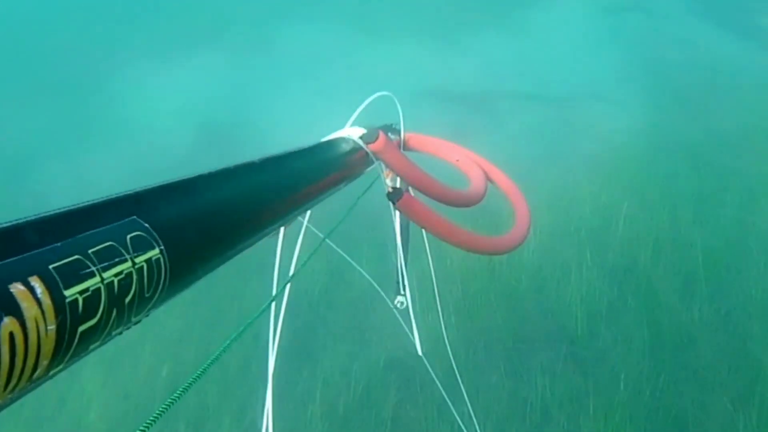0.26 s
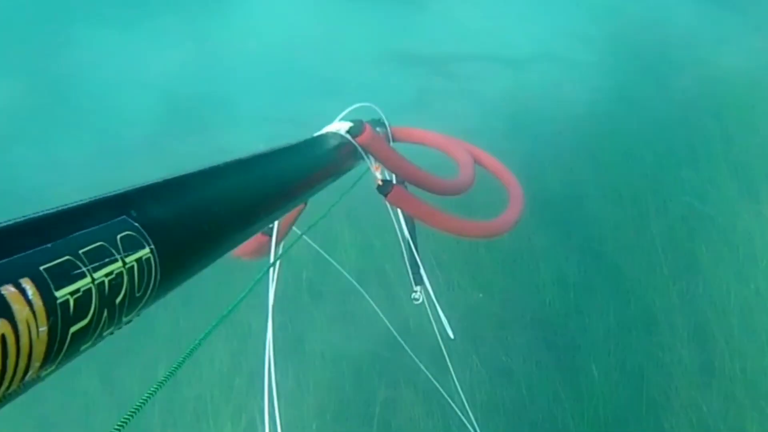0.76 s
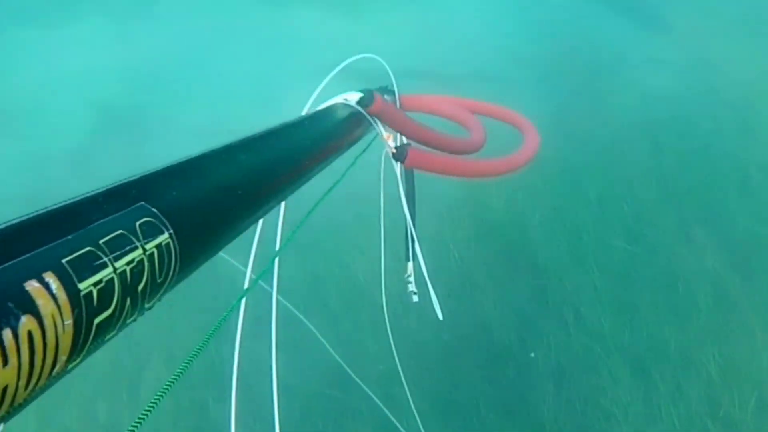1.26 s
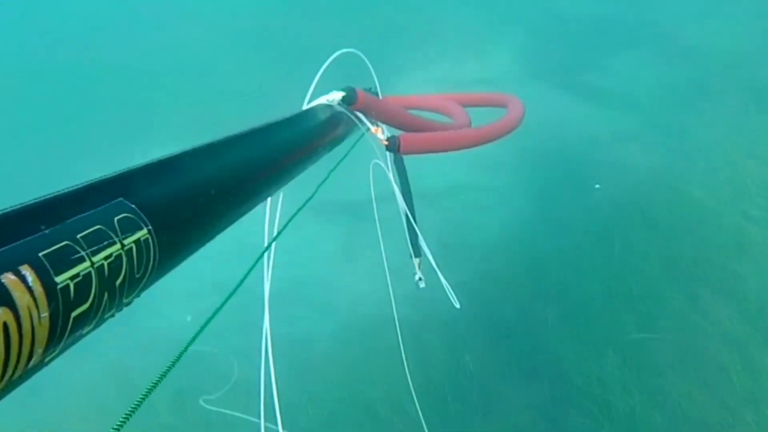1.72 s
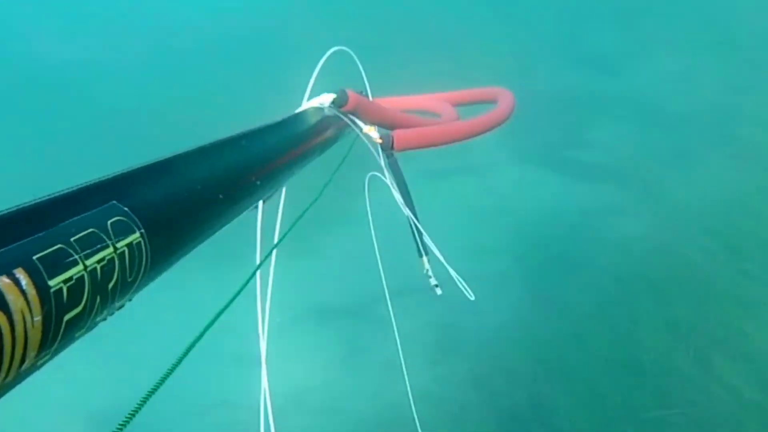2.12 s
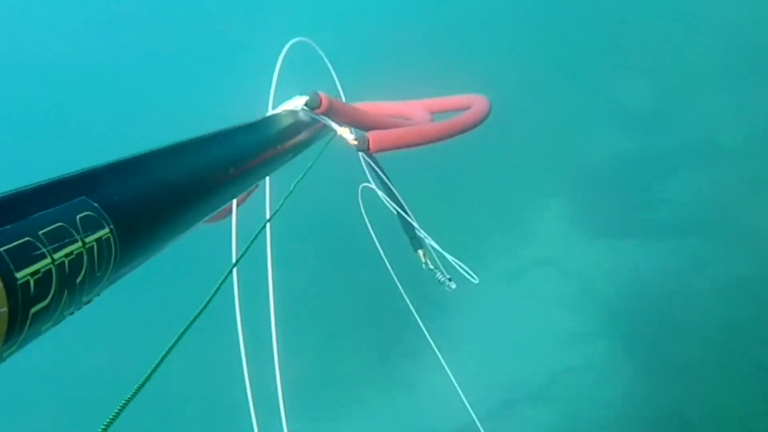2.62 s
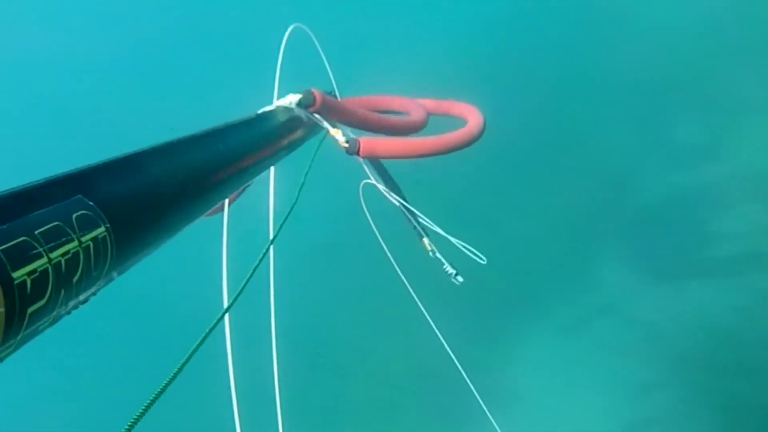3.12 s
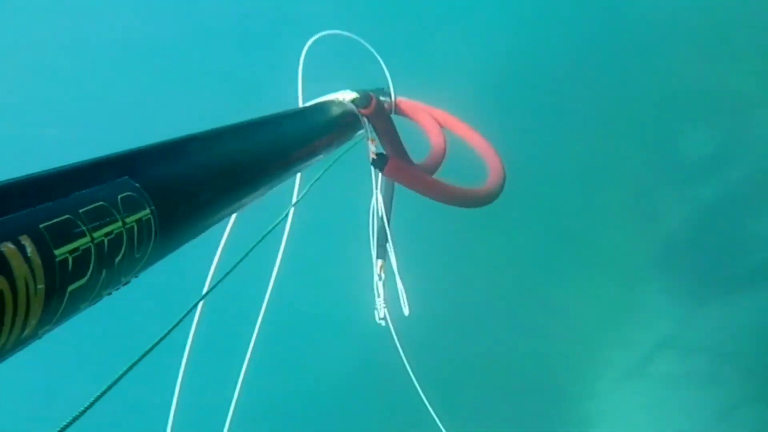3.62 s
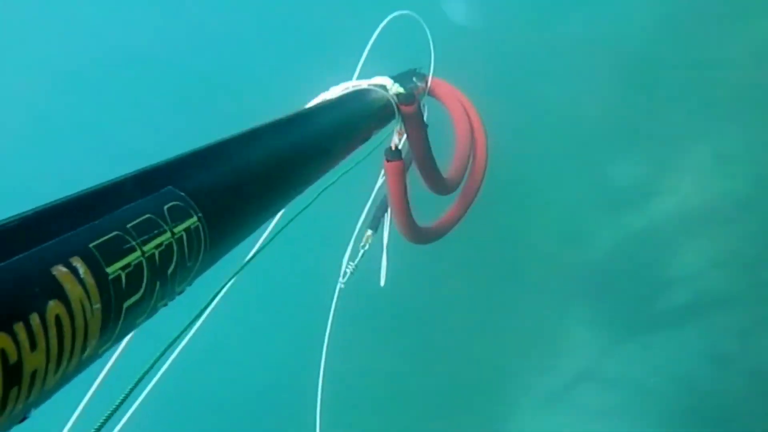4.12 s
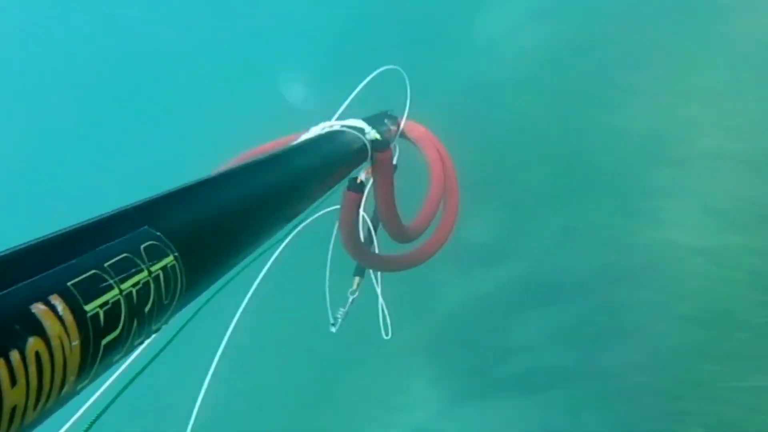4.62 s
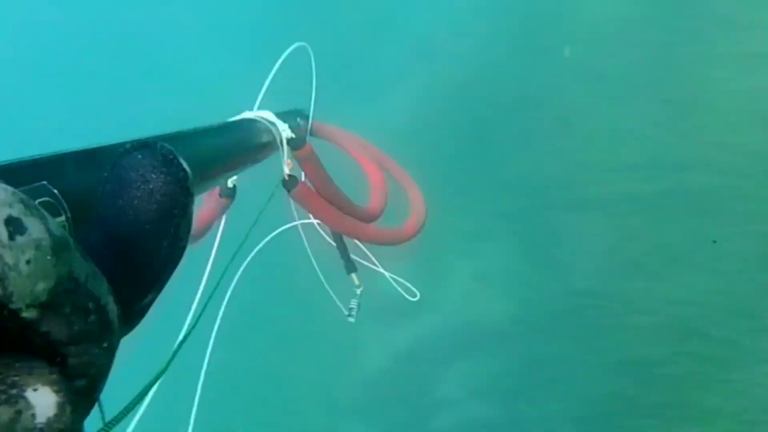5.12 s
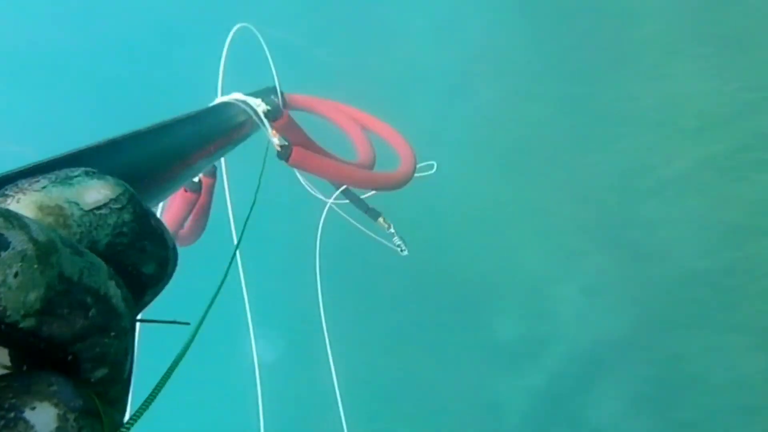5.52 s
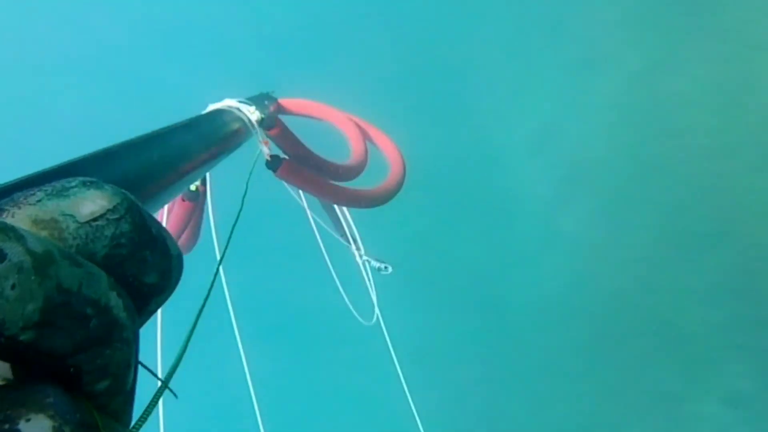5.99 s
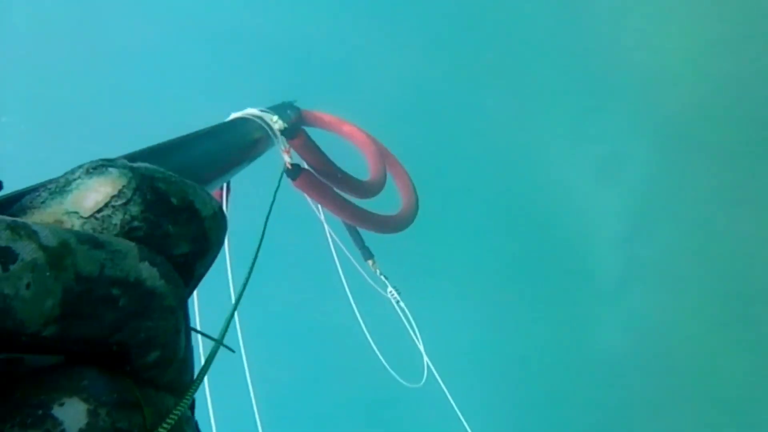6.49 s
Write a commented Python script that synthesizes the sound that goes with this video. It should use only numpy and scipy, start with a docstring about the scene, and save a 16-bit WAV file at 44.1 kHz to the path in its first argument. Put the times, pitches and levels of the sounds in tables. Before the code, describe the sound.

Close, muffled underwater sound in a sealed plastic housing. Soft gurgling flow and low pressure rumble lie over thin electronic hiss. Tiny bubble clusters tick and plop early on, with light taps on the case. Later knocks grow heavier, then a strong stroke brings distorted gushes, sudden dropouts, sharp gear clicks and ringing bubbles. Afterwards the rush eases to dull buffeting and repeated bumps and scrapes.

```python
"""Under water, inside a waterproof camera housing, while a diver swims with a speargun.
Water sways and rushes against the case: shaped noise, partly ringing the case's resonances.
Gear knocks and clicks on it as short noise bursts, and small bubbles ring as fading tones.
In the strongest strokes the pressure pins the microphone at its limit, chopping the rush into bursts.
Behind it all lie the hollow hum of the air in the case and the camera's hiss and whine."""
import sys
import numpy as np
from scipy import signal
from scipy.fft import rfft, irfft
from scipy.io import wavfile
from scipy.ndimage import uniform_filter1d

SR = 44100
rng = np.random.default_rng(int(sys.argv[2]) if len(sys.argv) > 2 else 0)


def to_wav(sig):
    """Store sig (one row per channel, or 1-D mono) as 16-bit WAV at the path in sys.argv[1].

    Samples outside -1..1 are clipped; the rate is SR.
    """
    pcm = np.clip(np.atleast_2d(sig), -1, 1) * 32767
    pcm = np.round(pcm).astype(np.int16)
    wavfile.write(sys.argv[1], SR, pcm.T)  # frames by channels


N = 297675
TIME = np.arange(N) / SR  # seconds

# relative noise spectra: (frequency [Hz], density [dB per Hz])
SWAY_COLOUR = [(4, -12), (9, 6), (17, -1), (30, -8), (42, -11.5), (60, -28.5), (110, -50), (250, -72)]
BUFFET_COLOUR = [(40, -19), (70, 6.5), (105, 3.5), (160, -14.5), (205, -11.5), (235, -6.5), (290, -12),
                 (370, -23.5), (700, -26.5), (1500, -63)]
GUSH_COLOUR = [(150, 12.5), (350, 10), (700, 9), (1000, 8.5), (1500, 4), (2400, -4), (3600, -13.5),
               (6000, -54.5)]
SPRAY_COLOUR = [(1500, -48.5), (3000, -3), (4200, -5.5), (5200, 0.5), (7000, -7.5), (10000, -9.5),
                (15000, -7), (16500, -11)]
HISS_COLOUR = [(300, 17.5), (2000, -11), (2500, -12), (3000, 4), (3600, -4), (4400, 0.5), (5200, -6),
               (6200, -2), (7400, -9), (11000, -9.5), (13000, 0.5), (14200, 5.5), (15200, 6.5),
               (16200, -30)]
# resonances of the case wall: (frequency [Hz], width [Hz], relative level [dB])
LOW_MODES = [(376, 720, -6.5), (585.2, 64.4, 16), (813.7, 44, 10.5), (925, 84, 2)]
HIGH_MODES = [(1052, 193, 6.5), (1296, 171, 7), (1553, 180, 6), (1780, 144, 2), (2260, 200, -7.5),
              (3300, 1800, -51)]
# resonances of the air inside the case: (frequency [Hz], basic width [Hz], relative level [dB])
AIR_MODES = [(229.7, 160, -1.5), (621, 30, 2.5), (810, 88, 1), (1037, 130, -14.5), (1154, 120, 0),
             (1240, 240, -13.5), (1625, 64, 4), (1767, 240, -1), (1910, 130, -3.5), (2103, 170, -5.5),
             (2866, 66, -12), (4290, 81, -16.5)]
# hum of that air: (time [s], level [dB])
HUM = [(0, -70), (0.28, -72), (0.5, -80), (1.5, -79.5), (2.1, -77), (2.7, -75), (6.75, -72.5)]
# strength of the current past the case, slacker between hard strokes: (time [s], level [dB])
CURRENT = [(0.0, -69.5), (0.43, -78.5), (0.9, -76), (1.11, -69), (1.31, -75.5), (1.96, -77.5), (2.4, -75),
           (2.9, -68.5), (3.12, -73), (3.3, -68), (3.5, -66.5), (3.8, -63.5), (3.96, -61.5), (4.4, -66.5),
           (5.33, -64.5), (5.6, -65), (5.96, -72), (6.2, -62), (6.3, -69.5), (6.43, -60.5), (6.75, -63)]
# low buffeting on the case, before its offset: (time [s], level [dB])
BUFFET = [(0.0, -76), (0.87, -72), (1.1, -54.5), (1.34, -70), (2.12, -75), (2.4, -71.5), (2.79, -70.5),
          (3.15, -73.5), (3.27, -60), (3.42, -67), (3.5, -61), (3.95, -57.5), (4.4, -49), (5.1, -60.5),
          (5.33, -50.5), (5.72, -53), (5.97, -61), (6.116, -59), (6.75, -50)]
# large eddies rolling over the case:
# (time [s], half length [s], change of pressure swing [dB], change of gurgle [dB])
EDDIES = [(0.063, 0.12, 3.5, -9), (1.202, 0.018, 13, -7), (2.4, 0.094, -5, 10.5), (3.281, 0.015, 8.5, 6.5),
          (3.776, 0.035, -5, 5.5), (3.653, 0.021, 7.5, 3.5), (4.288, 0.24, 11, -4.5),
          (5.048, 0.13, 10.5, -4), (5.437, 0.2, 6, -2.5), (5.829, 0.037, 7.5, -2), (6.553, 0.041, -11, -3)]
# bubble clouds drifting past: (time [s], half length [s], densest rate [ticks per s])
CLOUDS = [(0.64, 0.018, 350), (0.99, 0.08, 320), (1.68, 0.066, 170)]
# single bubbles, and a few fading tones that ring on just after the hardest knocks: # (time [s], starting pitch
# [Hz], relative level [dB])
BUBBLES = [(0.245, 6000, -61), (0.619, 2050, -62), (0.627, 1730, -57.5), (0.64, 2230, -62),
           (0.652, 2940, -60), (0.73, 2850, -65.5), (0.761, 2830, -67), (0.808, 4920, -64),
           (0.868, 2930, -60.5), (0.896, 2160, -53.5), (0.926, 6750, -66), (0.934, 1630, -65),
           (0.946, 1175, -59), (0.948, 2620, -56.5), (0.953, 4840, -63), (0.957, 1540, -53.5),
           (0.966, 1990, -54.5), (0.983, 1090, -57), (0.986, 1660, -56), (0.997, 5900, -61.5),
           (0.999, 3140, -66.5), (1.0, 1695, -57.5), (1.004, 807, -53), (1.034, 4840, -75),
           (1.091, 1770, -65), (1.117, 6000, -69), (1.179, 2310, -62.5), (1.202, 576, -52),
           (1.239, 4830, -70), (1.606, 1710, -65), (1.622, 6130, -67), (1.651, 8850, -64),
           (1.659, 3130, -70), (1.689, 940, -56), (1.688, 1735, -57.5), (1.693, 5160, -62.5),
           (1.714, 956, -49), (1.711, 1610, -65), (1.731, 2900, -65), (1.738, 855, -56), (1.74, 1590, -68),
           (1.766, 3000, -63.5), (1.767, 1500, -63), (1.787, 3200, -69), (1.789, 1510, -62.5),
           (2.268, 2040, -64.5), (3.092, 2560, -68), (3.327, 2710, -66.5), (3.364, 2850, -73),
           (3.371, 2230, -66), (3.653, 2900, -62.5), (3.974, 485, -36.5), (3.979, 810, -39),
           (4.002, 1450, -45), (4.139, 1260, -60), (4.236, 1266, -39.5), (4.306, 1670, -62),
           (4.543, 1413, -49), (4.982, 1670, -42), (5.037, 1070, -57.5), (5.27, 937, -36.5),
           (5.271, 1645, -44.5), (5.272, 3230, -50), (5.762, 808, -47.5)]
# gushes of water: (start [s], end [s], rush level [dB], spray level [dB])
GUSHES = [(0.622, 0.653, -80, -87), (0.931, 0.971, -61.5, -79), (0.988, 1.023, -65.5, -85),
          (3.973, 4.021, -47, -64), (4.04, 4.057, -45, -86), (4.095, 4.116, -68.5, -81),
          (4.14, 4.21, -58.5, -79), (4.231, 4.257, -44.5, -61), (4.424, 4.444, -50.5, -59),
          (4.457, 4.502, -53.5, -60.5), (4.524, 4.575, -52, -74.5), (4.84, 4.87, -57, -70.5),
          (4.883, 4.947, -56.5, -71.5), (4.94, 5.07, -49, -71), (5.081, 5.112, -52, -70)]
# knocks on the case, before the offsets of each part:
# (time [s], level [dB], brightness [dB], thud against the ring [dB], scuff length [s])
KNOCKS = [(0.656, -53.5, -14, -7, 0.034), (0.76, -55, -13, -15, 0.024), (1.071, -48.5, -12, 10.5, 0.013),
          (1.175, -44, -16.5, -16, 0.014), (1.196, -50.5, -10.5, -12, 0.013),
          (1.279, -58.5, -7, 0.5, 0.027), (1.297, -62.5, -16, 16, 0.048), (1.688, -55.5, -9, 3.5, 0.03),
          (1.713, -56.5, -16, 10.5, 0.037), (2.172, -67, 6, -12, 0.028), (2.432, -65, 8, -11, 0.056),
          (2.486, -53, -21, -29, 0.027), (2.862, -51.5, -25, 0, 0.083), (3.008, -45, -23, -7, 0.018),
          (3.229, -46, -35, -16, 0.036), (3.244, -43.5, -33, -26, 0.028), (3.326, -54, -22, -10, 0.022),
          (3.609, -42, -25, -27, 0.031), (3.766, -48, -6, -13, 0.076), (3.902, -48.5, -6.5, -3, 0.025),
          (3.974, -30.5, -6, -2.5, 0.017), (4.014, -32.5, -9, -3, 0.0099), (4.035, -25, -22, -19, 0.018),
          (4.185, -62, 5, 0, 0.018), (4.272, -39, -4, 10, 0.018), (4.327, -45.5, -7, 3.5, 0.0067),
          (4.237, -36, -5, 6, 0.024), (4.307, -53.5, 1.5, 20.5, 0.021), (4.567, -48, -5, -8, 0.012),
          (4.983, -26, -18, -2, 0.032), (5.01, -32, -3.5, -1, 0.037), (5.056, -37.5, -19, -11, 0.029),
          (5.303, -39.5, -7, -4.5, 0.02), (5.394, -38, -4, -2.5, 0.021), (5.494, -53.5, -1, 1, 0.019),
          (5.519, -41, -9, 3.5, 0.031), (5.571, -41, -9, -5.5, 0.09), (5.699, -39.5, -9, 0.5, 0.061),
          (5.719, -43.5, -15, -16, 0.034), (5.759, -37.5, -12, -2, 0.028), (5.798, -48, -11, 1, 0.02),
          (5.816, -45.5, -6.5, -18, 0.042), (5.876, -45.5, -6, -15, 0.024), (6.096, -41, -6, -7, 0.064),
          (6.171, -51, -15, -3.5, 0.028), (6.212, -48, -10, -15, 0.071), (6.33, -47, -10, -4, 0.067),
          (6.394, -55, -8, -19, 0.019), (6.445, -40.5, -11, -25, 0.053), (6.5, -36, -11, -15, 0.052),
          (6.519, -46, -8, -20, 0.048), (6.535, -50, -5.5, -10, 0.044), (6.577, -49.5, -9, -21, 0.013),
          (6.659, -46.5, -31, -18, 0.018), (6.675, -41, -8, -24, 0.024)]
# hard clicks of the gear, and at 5.2 s the snap as the microphone flips from one limit to the other: # (time
# [s], level [dB], length [s], pitch [Hz], treble [dB])
CLICKS = [(3.538, -52.5, 0.0053, 1130, -6), (3.542, -45, 0.0024, 3300, -11),
          (4.001, -49.5, 0.0016, 5570, 15), (4.237, -53, 0.0024, 1390, 1),
          (4.2662, -41, 0.00077, 2000, -11), (4.438, -48, 0.00027, 3020, 28),
          (4.552, -52, 0.00073, 2480, -3), (4.596, -32, 0.0024, 880, -18), (4.596, -34, 0.0018, 2650, -9),
          (4.622, -45, 0.004, 820, -16), (4.857, -50, 0.0057, 1580, -16), (4.962, -52, 0.003, 2850, 7),
          (5.017, -44.5, 0.00074, 1710, -20.5), (5.2, -39, 0.0015, 1600, -11),
          (5.247, -41.5, 0.0012, 4040, 25), (5.269, -39.5, 0.0014, 2450, -11),
          (5.272, -41.5, 0.0028, 1400, -13)]
PUSH, PULL = 1, -1
# surges that overload the microphone: (start [s], end [s], direction [PUSH or PULL], edge [s])
SURGES = [(4.023, 4.034, PULL, 0.002), (4.039, 4.043, PUSH, 0.0026), (4.047, 4.054, PULL, 0.004),
          (4.062, 4.096, PUSH, 0.0089), (4.108, 4.133, PUSH, 0.0045), (4.207, 4.23, PULL, 0.0037),
          (4.265, 4.274, PULL, 0.0022), (4.282, 4.294, PUSH, 0.0073), (4.332, 4.337, PULL, 0.0046),
          (4.352, 4.359, PUSH, 0.0039), (4.433, 4.45, PULL, 0.0032), (4.494, 4.524, PUSH, 0.0061),
          (4.556, 4.56, PUSH, 0.004), (4.581, 4.62, PUSH, 0.00095), (4.631, 4.835, PULL, 0.0084),
          (4.999, 5.004, PULL, 0.0051), (5.017, 5.023, PUSH, 0.0046), (5.05, 5.053, PULL, 0.0086),
          (5.065, 5.073, PUSH, 0.0047), (5.102, 5.198, PUSH, 0.0055), (5.202, 5.261, PULL, 0.0018)]

# layer level at the usual current [dB], and the dB it gains per dB of current
USUAL_CURRENT_DB = -68
SWAY_DB, SWAY_FOLLOWS = -38, 0.75
LOW_FLOW_DB, LOW_FLOW_FOLLOWS = -68.5, 1.21
HIGH_FLOW_DB, HIGH_FLOW_FOLLOWS = -75, 0.93
# how much of an eddy's dB change reaches the other layers
EDDY_BUFFET_SHARE, GURGLE_BUFFET_SHARE, GURGLE_HIGH_SHARE = 0.3, 0.29, 0.24
# time for a bubble up to 1 kHz to fade by 60 dB, and the power of pitch that shortens it above
BUBBLE_T60_S, BUBBLE_SHORTENS = 0.051, 0.75
STRAY_TICKS_PER_S = 2
MIC_LIMIT = 0.066  # sample value
# a pinned microphone holds its limit this long, then relaxes with this time constant
PIN_HOLD_S, PIN_RELAX_S = 0.052, 0.048
WHINE_HZ = 15000
TOP_HZ = 17000  # from here up, everything is at least 70 dB down


def from_db(db):
    """Turn decibels into a gain."""
    return 10 ** (np.asarray(db) / 20)


def rms_one(x):
    """Scale a sound to an average strength (rms) of 1."""
    return x / np.sqrt(np.mean(x ** 2) + 1e-20)


def in_time(rows):
    """Draw straight lines between timed rows: one curve per column."""
    s, *columns = np.transpose(rows)
    return [np.interp(TIME, s, c) for c in columns]


def swells(rows):
    """Add up bell-shaped swells."""
    return sum(height * np.exp(-((TIME - s) / half) ** 2) for s, half, height in rows)


def butter(x, hz, kind, order=2):
    """Filter a sound with a smooth Butterworth slope."""
    hz = np.clip(hz, 1, .45 * SR)
    return signal.sosfilt(signal.butter(order, hz, kind, fs=SR, output="sos"), x + 1e-18)


def noise(colour):
    """Make noise with the given spectrum and an rms of 1."""
    hz, db = np.transpose(colour)
    bins = np.maximum(np.arange(N // 2 + 1) * SR / N, 1)
    gain = from_db(np.interp(np.log(bins), np.log(hz), db, left=-120, right=-120))
    return rms_one(irfft(rfft(rng.standard_normal(N)) * gain, N))


def drift(rate):
    """Wander at random through this many new values per second, with an rms of 1."""
    knots = rng.standard_normal(4000)
    return rms_one(np.interp(TIME * rate, np.arange(len(knots)), knots))


def steady(x, seconds):
    """Even out the slow swells of a noise."""
    return x / np.sqrt(uniform_filter1d(x ** 2, max(int(seconds * SR), 2)) + 1e-9)


def resonate(x, modes):
    """Ring parallel resonances of alternating sign; narrow ones ring longer."""
    out = 0
    for k, (hz, width, db) in enumerate(modes):
        r = np.exp(-np.pi * width / SR)
        feedback = [1, -2 * r * np.cos(2 * np.pi * hz / SR), r * r]
        ring = signal.lfilter([1, 0, -1], feedback, x + 1e-18)
        out = out + (-1) ** k * from_db(db) * (1 - r * r) / 2 * ring
    return out


def chatter(envelope):
    """A short random burst with unit energy, its spectrum levelled before a final fade."""
    spectrum = rfft(rng.standard_normal(len(envelope)) * envelope)
    burst = irfft(spectrum / (np.abs(spectrum) + 1e-12), len(envelope)) * np.sqrt(envelope)
    return burst / np.sqrt(np.sum(burst ** 2))


def add(out, s, sound):
    """Mix a sound in at time s."""
    at = int(s * SR)
    out[at:at + len(sound)] += sound[:N - at]


def electronics(hiss_db=-82.5, whine_db=-94):
    """The camera's own hiss is shaped noise; its thin whine is a steady sine."""
    whine = np.sqrt(2) * np.sin(2 * np.pi * WHINE_HZ * TIME)
    return from_db(hiss_db) * noise(HISS_COLOUR) + from_db(whine_db) * whine


def hum():
    """The air in the case hums hollowly: noise passes twice through each of its resonances."""
    level_db, = in_time(HUM)
    tones = 0
    for hz, width, db in AIR_MODES:
        narrow = resonate(rng.standard_normal(N), [(hz, 0.58 * width, 0)])
        tones = tones + from_db(db) * resonate(narrow, [(hz, 3.2 * width, 0)])
    return from_db(level_db) * rms_one(tones)


def current():
    """How far the current is above its usual strength, in dB."""
    return in_time(CURRENT)[0] - USUAL_CURRENT_DB


def eddies_db():
    """How much passing eddies raise or lower the pressure swing and the gurgle, in dB."""
    s, half, swell, gurgle = np.transpose(EDDIES)
    return swells(zip(s, half, swell)), swells(zip(s, half, gurgle))


def sway(flutter_db=4.5, buffet_offset_db=1.0):
    """Large eddies rock the pressure slowly, more so in a strong current; smaller ones buffet the case."""
    eddy_db, gurgle_db = eddies_db()
    sway_db = SWAY_DB + SWAY_FOLLOWS * current() + eddy_db
    buffet_db = in_time(BUFFET)[0] + buffet_offset_db
    buffet_db = buffet_db + EDDY_BUFFET_SHARE * eddy_db + GURGLE_BUFFET_SHARE * gurgle_db
    slow = from_db(sway_db) * steady(noise(SWAY_COLOUR), 0.12)
    flutter = flutter_db * drift(45)
    return slow + from_db(buffet_db + flutter) * steady(noise(BUFFET_COLOUR), 0.037)


def flow(surging_db=3.5, lumps_db=5.5, grain_db=0.0, taps_per_s=80, tap_size=11.2, wall_hz=2600):
    """Lumpy turbulence and tiny taps, denser in a strong current, ring the case; its wall dulls them."""
    speed_db = current()
    _, gurgle_db = eddies_db()
    low_db = LOW_FLOW_DB + LOW_FLOW_FOLLOWS * speed_db + gurgle_db
    high_db = HIGH_FLOW_DB + HIGH_FLOW_FOLLOWS * speed_db + GURGLE_HIGH_SHARE * gurgle_db

    unevenness_db = surging_db * np.tanh(drift(28)) + lumps_db * np.tanh(drift(90))
    eddies = rms_one(from_db(unevenness_db + grain_db * drift(400)))
    tap_now = rng.random(N) < taps_per_s * from_db(speed_db / 2) / SR
    taps = tap_size * rng.uniform(-3.0, 2.87, N) * tap_now

    low = resonate(eddies * rng.standard_normal(N) + taps, LOW_MODES)
    high = resonate(eddies * rng.standard_normal(N) + taps, HIGH_MODES)
    low = rms_one(butter(low, 370, "high"))
    high = rms_one(butter(high, wall_hz, "low", order=4))
    return from_db(low_db) * low + from_db(high_db) * high


def gushes(grain_db=3.0, lumps_db=3.0):
    """Fast water scours the case with a grainy rush topped by a bright spray."""
    rush, spray = np.zeros((2, N))
    for start, end, rush_db, spray_db in GUSHES:
        on = (TIME > start) & (TIME < end)
        rush[on], spray[on] = from_db(rush_db), from_db(spray_db)
    rush, spray = uniform_filter1d([rush, spray], int(0.0046 * SR))  # soften starts and ends
    grain = steady(from_db(grain_db * drift(500) + lumps_db * np.tanh(drift(140))), 0.073)
    return grain * (rush * noise(GUSH_COLOUR) + spray * noise(SPRAY_COLOUR))


def fizz(level_db=-71, spread_db=10):
    """Tiny bubbles tick at random, thickest as clouds drift past, each ringing for a few cycles."""
    out, t = np.zeros(N), TIME[:SR // 60]
    per_s = STRAY_TICKS_PER_S + swells(CLOUDS)
    luck, pitch, size = rng.random((3, N))
    for at in np.flatnonzero(luck < per_s / SR):
        hz = 1800 * 5.5 ** pitch[at]
        ring = np.sin(2 * np.pi * hz * t) * np.exp(-t * hz / 5)
        add(out, TIME[at], from_db(level_db + spread_db * size[at] ** 2) * ring)
    return out


def bubbles(rise=0.74, splash_db=-16, splash_s=0.0071):
    """Each bubble pinches off with a small splash and rings briefly, its pitch rising a little."""
    out, t = np.zeros(N), TIME[:SR // 8]
    swell = 1 - np.exp(-(t / .0015) ** 2)
    for s, hz, db in BUBBLES:
        t60 = BUBBLE_T60_S * min(1000 / hz, 1) ** BUBBLE_SHORTENS
        fade = from_db(-60 * t / t60)
        ring = fade * np.sin(2 * np.pi * hz * t * (1 + rise * t))
        splash = rms_one(butter(rng.standard_normal(len(t)), [hz / 2, 1.06 * hz], "band"))
        splash = splash * np.exp(-t / splash_s)
        add(out, s, from_db(db + 6.5) * swell * (ring + from_db(splash_db) * splash))
    return out


def varied(modes, vary_db):
    """Shift each resonance's level at random, so that no two knocks sound alike."""
    return [(hz, width, db + vary_db * rng.standard_normal()) for hz, width, db in modes]


def knocks(grit=0.33, low_db=-4, upper_db=-1, thud_db=-4, wall_hz=2400, crackle_db=4.5, vary_db=2.0):
    """A blow with a short crackling scuff rings a new mix of the case's modes and gives a dull thud."""
    out, t = np.zeros(N), TIME[:SR // 6]
    for s, level, bright, thud, scuff_s in KNOCKS:
        steps = np.repeat(rng.standard_normal(len(t)), SR // 500)[:len(t)]  # a new step every 2 ms
        grains = rms_one(from_db(crackle_db * steps))
        scuff_fade = from_db(-60 * t / max(scuff_s, .003))
        blow = grit * grains * rng.standard_normal(len(t)) * scuff_fade
        blow[0] += 1.8  # the sharp first contact
        low, high = varied(LOW_MODES, vary_db), varied(HIGH_MODES, vary_db)
        parts = [(butter(resonate(blow, low), [240, 3200], "band"), level + low_db),
                 (butter(resonate(blow, high), wall_hz, "low"), level + bright + upper_db),
                 (butter(blow, [90, 250], "band"), level + thud + thud_db)]
        for sound, db in parts:  # each level counts the whole energy as if packed into 2.8 ms
            add(out, s, from_db(db) * sound * np.sqrt(0.0028 * SR / np.sum(sound ** 2)))
    return out


def air_ring(x, ring_db=-12, narrowing=0.18):
    """Knocks and bubbles leave the air in the case ringing briefly at its resonances."""
    ring = sum(resonate(x, [(hz, narrowing * width, db)]) for hz, width, db in AIR_MODES)
    return x + from_db(ring_db) * ring


def clicks(low_hz=450, breadth=0.64, treble_hz=5000, graze_db=-22):
    """Hard contacts graze, then bite: tight chatter around a broad pitch, with a bright edge."""
    lead = .006  # seconds of room for the graze before the bite
    out, t = np.zeros(N), TIME[:SR // 25] - lead
    for s, db, length, hz, treble_db in CLICKS:
        bite = np.exp(-(t / length - .5) ** 2 * 2)
        envelope = bite + from_db(graze_db) * np.exp(-(t / (2 * length)) ** 2)
        body = butter(resonate(chatter(envelope), [(hz, breadth * hz, 0)]), 2 * hz, "low")
        edge = butter(chatter(envelope), treble_hz, "low", order=1)
        burst = butter(rms_one(body) + from_db(treble_db) * rms_one(edge), low_hz, "high")
        # the level counts the whole energy as if packed into the click's length
        add(out, s - lead, from_db(db) * burst * np.sqrt(abs(length) * SR / np.sum(burst ** 2)))
    return out


def held(seconds):
    """Pressure that the pinned microphone shows after this long: it holds, then relaxes."""
    return MIC_LIMIT * np.exp(-np.maximum(seconds - PIN_HOLD_S, 0) / PIN_RELAX_S)


def heave(pressure, reach_s=0.014, share=0.72):
    """Around the surges the slow pressure swings directly from one surge's push or pull to the next."""
    corners = []
    for start, end, direction, _ in SURGES:
        corners += [(s, direction * held(s - start)) for s in (start, end)]
    line = np.interp(TIME, *np.array(corners).T)
    swing = share * MIC_LIMIT * np.sin(np.pi / 2 * line / MIC_LIMIT)
    gaps = [np.maximum(np.maximum(start - TIME, TIME - end), 0) for start, end, _, _ in SURGES]
    away = np.min(gaps, axis=0)  # seconds to the nearest surge
    return pressure + np.exp(-(away / reach_s) ** 2) * (swing - pressure)


def surges(pressure):
    """Each surge eases the microphone over to its limit, where it stops following the water."""
    out = pressure.copy()
    for start, end, direction, edge in SURGES:
        near = np.abs(TIME - (start + end) / 2) < (end - start) / 2 + edge
        inside = np.minimum(TIME[near] - start, end - TIME[near])  # negative in the edges
        pinned = np.sin(np.pi / 2 * np.clip(1 + inside / edge, 0, 1)) ** 2
        out[near] += pinned * (direction * held(TIME[near] - start) - out[near])
    return out


def scene():
    """Water and knocks meet the microphone's limit; hard clicks and faint noise come through regardless."""
    impacts = air_ring(knocks() + bubbles())
    water = heave(sway()) + flow() + gushes() + fizz()
    pressure = water + hum() + impacts + electronics()
    limited = pressure / (1 + (pressure / MIC_LIMIT) ** 8) ** (1 / 8)  # bends only near the limit
    faint_noise = from_db(-89.0) * rng.standard_normal(N)
    return (surges(limited) + clicks() + faint_noise)[None]


def record(dry):
    """A steep filter cuts off the very top of the treble."""
    return signal.sosfilt(signal.cheby2(14, 70, TOP_HZ, fs=SR, output="sos"), dry)


dry = scene()
out = record(dry)
to_wav(out)
```